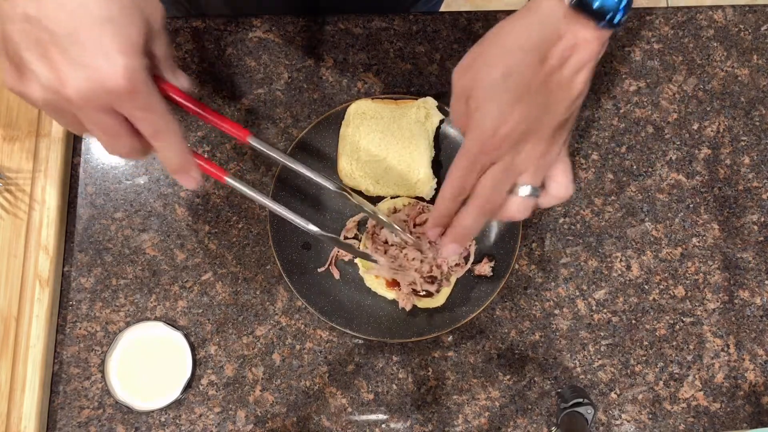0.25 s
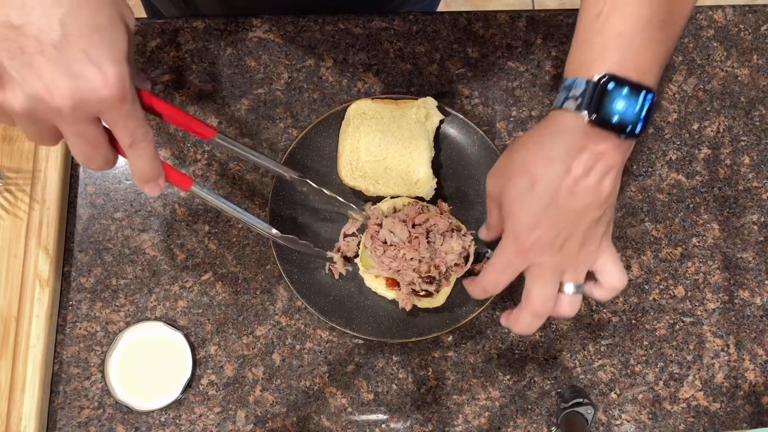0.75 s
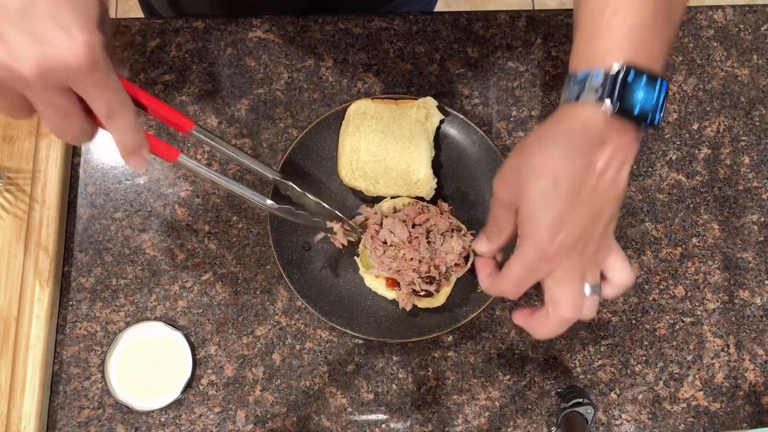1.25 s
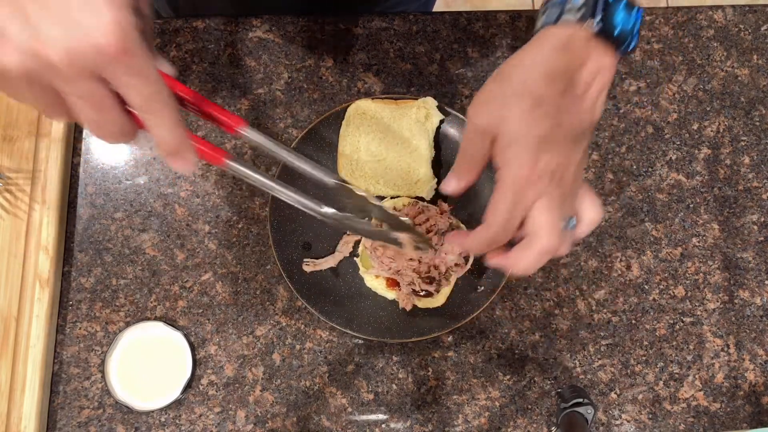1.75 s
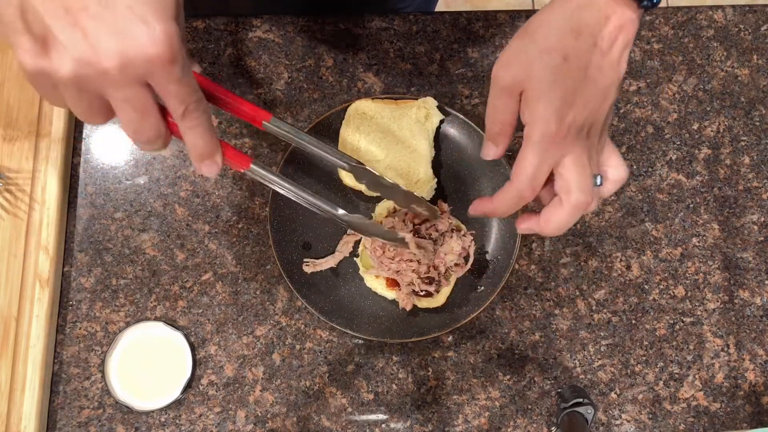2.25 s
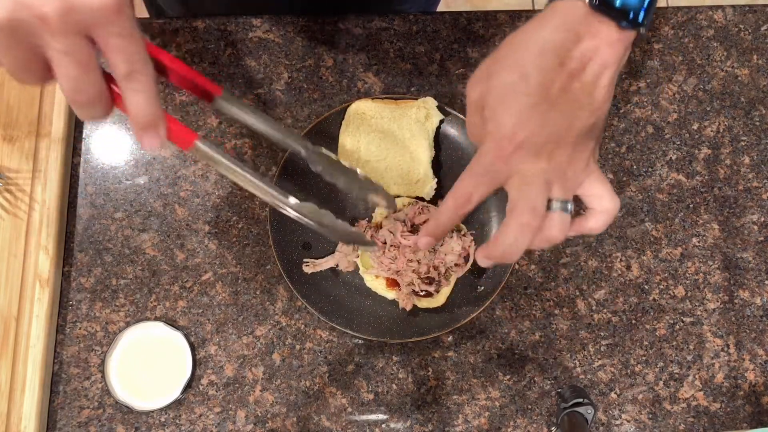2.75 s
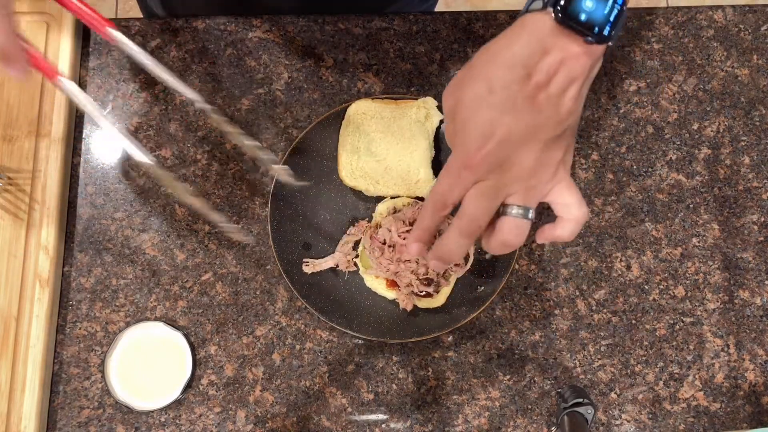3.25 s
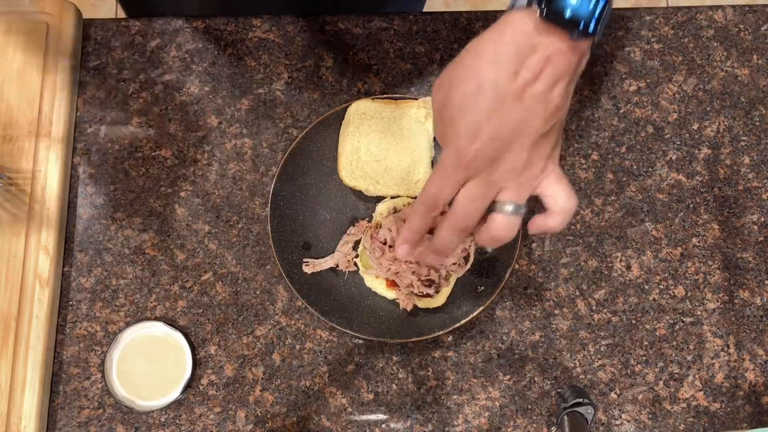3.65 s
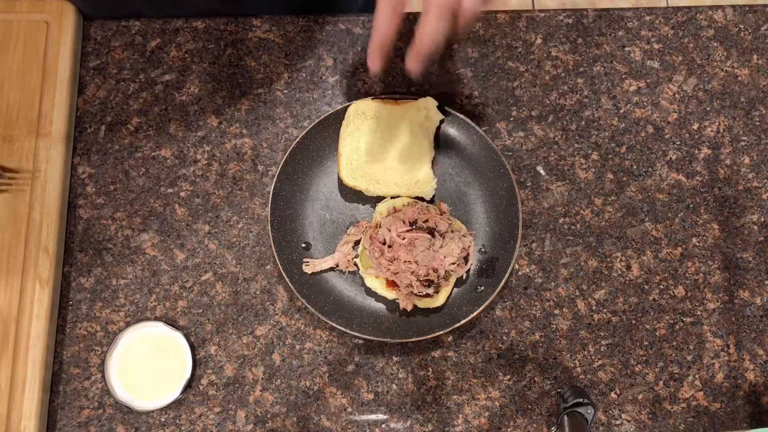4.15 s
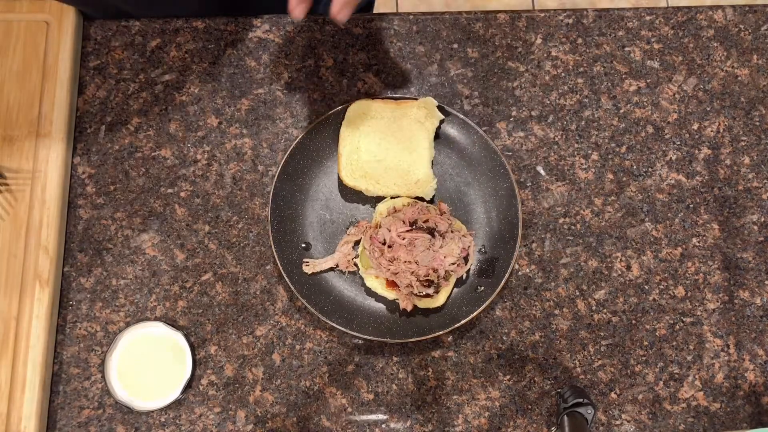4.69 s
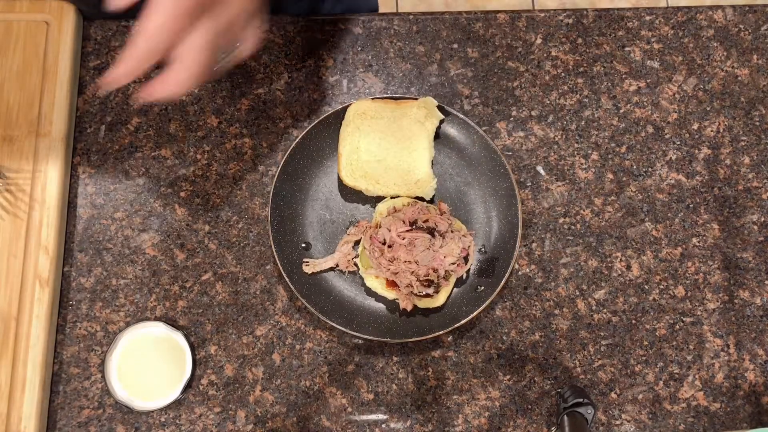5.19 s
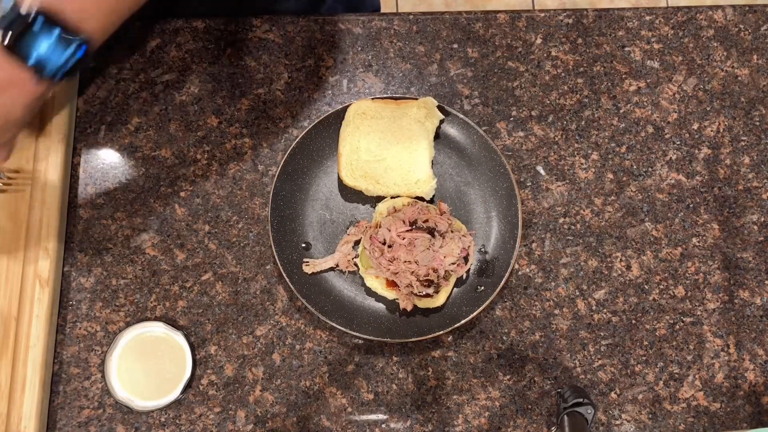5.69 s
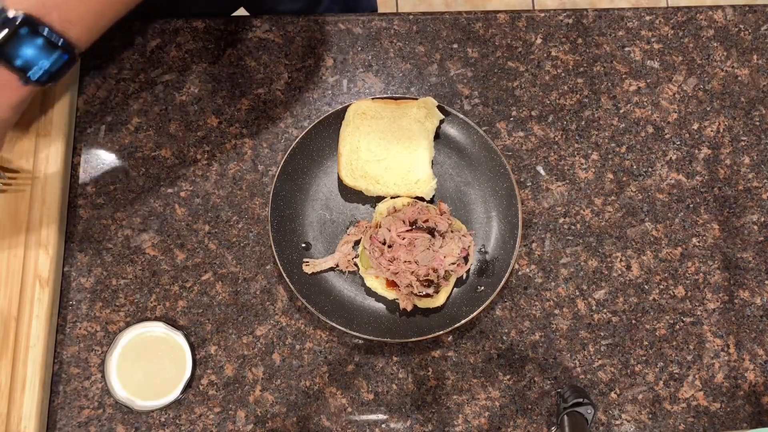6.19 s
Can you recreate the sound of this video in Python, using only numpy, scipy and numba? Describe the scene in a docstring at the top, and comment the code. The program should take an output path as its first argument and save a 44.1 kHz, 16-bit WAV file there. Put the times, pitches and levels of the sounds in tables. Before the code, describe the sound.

Soft moist food clicks and light plate taps, then tongs clack hard onto a wooden board and a spoon clinks sharply in a live kitchen.

```python
"""A kitchen counter heard from close above, on a phone: steel tongs and fingers arrange moist food on a plate,
the tongs are laid down on a wooden board, then a spoon taps a dish. Each blow is a noisy crack with damped
modes; food is filtered clicks; rubbing, shuffling and air are shaped noise. Appliances hum and hiss behind,
hard walls ring after every blow, and the phone turns its gain down after the loudest knocks."""
import sys
import numpy as np
from scipy import signal
from scipy.fft import rfft, irfft
from scipy.io import wavfile
from scipy.ndimage import uniform_filter1d
from numba import njit

SR = 44100
rng = np.random.default_rng(int(sys.argv[2]) if len(sys.argv) > 2 else 0)


def digitize_waveform(pressure):
    """Quantize a signal to 16-bit integers and store it at the path in sys.argv[1].

    Rows of a 2-D input are taken as channels; values are limited to [-1, 1].
    """
    field = np.atleast_2d(pressure).T
    bounded = np.clip(field, -1, 1)
    quanta = np.round(bounded * 32767).astype(np.int16)
    wavfile.write(sys.argv[1], SR, quanta)


def gain_from_db(level_db):
    """Turn a decibel level (scalar or array-like) into a linear amplitude factor."""
    decades = np.asarray(level_db, float) / 20
    return 10 ** decades


N = 283563
TIME = np.arange(N) / SR

# blows at the counter: (time [s], direct peak level [dB], brightness [dB per octave], place struck [0-1])
PLATE_TAPS = [(.6803, -28.5, 0, 0.49), (.759, -36.5, 1.5, 0.06), (.784, -38, 4.5, 0.5),
              (1.545, -47.5, -4, .24)]
BOARD_KNOCKS = [(4.245, 0, -0.86, 0.38), (4.5121, 4.5, 0.92, 0.072), (4.5312, -11, 0.92, 0.46)]
DISH_TAPS = [(5.6667, -6, 0.31, 0.072), (5.8678, -4, 0.22, 0.31), (6.0431, -5, 0.89, 0.22)]
SPOON_CLINKS = [(6.1869, -10, 0.58, 0.307), (6.3944, -21, -0.05, 0.38)]
# contact on plate, board, dish, spoon: (mode spread [share of frequency], crack decay constant [s],
# crack centre at zero brightness [Hz], crack peak over ring peak [dB])
CONTACT = [(0.0016, 0.0017, 2200, -9), (0.034, 0.002, 1380, -0.3), (0.0042, 0.0023, 2400, 1.7),
           (0.0016, 0.0017, 2630, -1.5)]
# what plate, board, dish, spoon send to the walls: (send of the whole [dB], extra on the ring alone [dB])
WALL_SENDS = [(-17, 0.5), (-6, -11), (-15.5, 0.3), (-16.5, 1)]
# ringing modes, before brightness, place and spread: (frequency [Hz], level [dB], t60 [s])
PLATE = [(1410, -10, 0.12), (1855, 6.5, 0.093), (2176, 2.5, 0.065), (3060, -4, 0.13), (4200, -4.5, 0.076),
         (5500, -9, 0.089), (6546, -19, 0.25), (9200, -11, 0.069), (11900, -15.5, 0.16)]
BOARD = [(139, -16.5, 0.052), (318.7, -2.5, 0.05), (499, -6.5, 0.13), (638, -1, 0.049), (750, -6, 0.045),
         (793, 4, 0.028), (1049, 1, 0.044), (1206, 7.5, 0.017), (1380, -0.5, 0.025), (1768, 6, 0.043),
         (2036, 0, 0.074), (2183, -6.5, 0.023), (2640, -16.5, 0.018), (3027, 3, 0.018), (3500, -9.5, 0.017),
         (4567, -8, .015), (5900, -7, .01), (8000, -29, 0.011), (11000, -25, .01), (12450, -17.5, .01),
         (15300, -25.5, 0.011)]
DISH = [(309, -14, 0.066), (670, -10.5, 0.019), (997, -12, 0.23), (1198, 3, 0.0074), (1532, -6.5, 0.049),
        (1676, -6.5, 0.065), (1817, 3, 0.056), (1950, -2.5, 0.06), (2137, -11.5, 0.042),
        (2524, -3.5, 0.056), (2750, -5.5, 0.028), (3355, -34, 0.052), (3550, -11.5, 0.072),
        (3830, -12, .05), (4146, -8, 0.06), (4280, 3, 0.016), (4700, -6.5, 0.053), (5200, -12.5, 0.061),
        (6020, -16, 0.056), (7040, -14, 0.023), (8200, -13, 0.023), (9920, -36, 0.013),
        (12800, -18.5, 0.015)]
SPOON = [(1723, -8.5, 0.079), (2240, -7.5, 0.025), (2934, 3.5, 0.013), (4020, -2, 0.035), (4500, -25, .05),
         (5150, -30, 0.072), (5900, -17, .1), (6630, -1, 0.077), (7600, -27, .08), (8800, -19, 0.065),
         (11320, -18.5, 0.066), (13900, -21, 0.047)]
# close neighbours of each mode: (offset [units of the mode spread])
NEIGHBOURS = [-1.47, 0.099, 1.05]

# tongs rubbing along the board: (start [s], end [s], rms level before flutter [dB])
RUBS = [(4.183, 4.19, -42.5), (4.27, 4.272, -36.5), (4.315, 4.332, -39)]
# spectrum of the rubbing: (frequency [Hz], relative level per Hz [dB])
RUB_COLOUR = [(880, -18.5), (1500, 3), (2890, -2), (3540, -2), (5190, 0.5), (5950, -7.5), (10400, -5.5),
              (15500, -17.5)]
# steel arms rattling between board knocks: (time [s], peak level [dB])
RATTLE = [(4.4318, -44), (4.456, -35), (4.4734, -35), (4.489, -37.5)]
# modes of the arms, before place and spread: (frequency [Hz], level [dB], t60 [s])
ARMS = [(5800, -3.5, 0.069), (7040, -4, 0.067), (11100, -6.5, 0.066), (13950, -1.5, 0.1), (14740, -9, .06)]

# moist food clicking under fingers and steel, the loudest ones: (time [s], peak level [dB], centre [Hz])
CLICKS = [(0.0357, -34, 6200), (0.0568, -36, 2480), (0.0615, -34, 8000), (0.0763, -27.5, 5600),
          (0.1227, -33, 8150), (0.1432, -38, 3660), (0.1547, -41, 8000), (0.183, -42, 6500),
          (0.2021, -37, 5200), (0.4778, -44, 8000), (1.4233, -36, 7500), (1.781, -26.5, 10400),
          (1.8435, -40, 9700), (2.9297, -39, 11000), (2.9402, -39, 8800), (2.9847, -42, 9700),
          (2.991, -32.5, 7650), (3.0212, -38, 5700), (3.0576, -32.5, 3500), (3.06, -40, 12000),
          (3.08, -38, 7200), (3.1344, -36.5, 5470), (3.262, -35.5, 13100), (3.2836, -33, 7600),
          (3.3552, -31.5, 4900), (3.366, -31.5, 7200), (3.4639, -34, 5530), (3.5288, -36, 3900),
          (3.568, -36.5, 2870), (3.607, -40.5, 8200), (4.182, -28.5, 5800), (4.2551, -18.5, 2800),
          (4.2776, -23.5, 3200), (4.3384, -22.5, 4200), (5.567, -28.5, 9200), (5.6347, -28.5, 7700),
          (5.6527, -41, 9500)]
# fingers pressing the food: (start [s], end [s], random tiny clicks [per s])
PRESSES = [(0, 0.21, 170), (1.41, 1.46, 150), (2.92, 3.636, 200), (5.58, 5.659, 40)]
# bands of the tiny clicks: (centre [Hz], smallest impulse before filtering [dB])
TINY_CLICKS = [(5500, -35.5), (8000, -39.5), (11500, -43)]

# dull knocks further off, heard mostly through the room:
# (time [s], rms level before its envelope [dB], centre [Hz], decay constant [s], send to the room [dB])
FAR_KNOCKS = [(0.381, -38.5, 810, 0.015, -9), (0.761, -43, 1320, 0.017, -15),
              (0.854, -43.5, 3520, 0.0056, -6), (0.893, -37, 1380, 0.015, -13),
              (2.043, -32, 2240, 0.0047, -10), (2.045, -38, 940, 0.0096, -5.5),
              (2.338, -37.5, 750, 0.017, -4.5), (2.342, -42, 2340, 0.0081, -5.5),
              (3.353, -35.5, 2390, 0.0058, -18.5), (4.467, -36, 550, 0.05, -0.5),
              (6.258, -28.5, 280, 0.032, -18), (6.26, -24.5, 700, 0.0049, -9)]
# a faint squeak: (start [s], end [s], rms level [dB])
SQUEAK = [(3.445, 3.5, -53.5)]
# someone shuffling about the room: (start [s], end [s], rms level before flutter [dB])
SHUFFLE = [(0, .05, -59), (.4, .65, -65), (.8, 1.1, -53.5), (2.67, 2.83, -46.5), (3.43, 3.5, -52.5),
           (3.82, 4.4, -52)]
# spectrum of the shuffling: (frequency [Hz], relative level per Hz [dB])
SHUFFLE_COLOUR = [(120, -29), (200, -3), (237, -14), (343, -2.5), (504, -5), (830, -5.5), (1240, -13),
                  (6000, -29), (7800, -55.5), (13200, -120)]
# bumps through the counter into the stand:
# (time [s], rms level over the push [dB], push length [s], brightness [dB per octave])
BUMPS = [(1.809, -36, 0.09, -2.2), (1.848, -45.5, 0.21, -5), (4.077, -42, 0.039, -7.5),
         (4.514, -36.5, 0.04, -5.5)]
# resonances of the stand: (centre [Hz], width [Hz], relative level before brightness [dB])
STAND = [(28, 16, -13), (96, 46, -2), (197, 31, -2), (355, 133, -5), (550, 390, -17.5)]

# decay of the room: (octave centre [Hz], t60 [s])
ROOM_T60 = [(125, 0.55), (250, 0.52), (500, 1), (1000, 0.52), (2000, 0.82), (4000, 0.4), (8000, 0.11),
            (14000, 0.35)]
# motor tones: (mean frequency [Hz], rms level before waver [dB], waver [dB])
HUM = [(58.6, -49.5, -2), (98.5, -49.5, 2.3)]
# narrow appliance noise: (centre [Hz], width of the first filter [Hz], rms level [dB])
WHIRR = [(27.22, 11, -66), (209.6, 16, -53.5), (270, 11, -60.5), (328.5, 11.46, -63.5), (434.3, 7.2, -64),
         (1598, 22, -69.5), (3500, 210, -70.5), (4072, 61, -72.5), (5190, 170, -69), (5706, 160, -65),
         (7310, 470, -68.5), (7790, 110, -70), (9840, 330, -68.5), (10400, 130, -76), (13950, 1500, -69),
         (15600, 400, -71)]
# spectrum of the broad air noise: (frequency [Hz], relative level per Hz [dB])
AIR = [(18, -33), (30, -10), (80, -10.5), (140, -7), (437, -15.5), (889, -22), (1220, -24), (2500, -30.5),
       (4200, -34), (6400, -35.5), (8500, -37.5), (12000, -38.5), (16000, -56.5)]


def blows(events, modes, spread, crack_s, crack_hz, crack_db, room_db, ring_room_db):
    """Each blow is a short noisy crack plus a ring; returns the direct sound and what reaches the walls."""
    tick_db, tick_hz, tick_s = -20, 13000, 0.0017
    direct, to_walls = np.zeros((2, N))
    t = TIME[:SR // 4]
    for s, db, tilt_db, place in events:
        body = ring(modes, tilt_db, place, spread)
        body /= np.abs(body).max()
        hz = crack_hz * gain_from_db(tilt_db)  # brighter blows crack higher
        crack = band(rng.standard_normal(len(t)), hz, 0.95 * hz) * np.exp(-t / crack_s)
        sound = body + gain_from_db(crack_db) * crack / np.abs(crack).max()
        # bright edge of hard contact
        tick = band(rng.standard_normal(len(t)), tick_hz, 0.81 * tick_hz) * np.exp(-t / tick_s)
        sound += gain_from_db(tick_db) * tick / np.abs(tick).max()
        sound *= 1 - np.exp(-t / .0004)  # contact takes a moment
        gain = gain_from_db(db) / np.abs(sound).max()
        add(direct, s, sound * gain)
        # the whole counter passes a broad snap to the walls; the ring has its own share
        snap = band(impulse(sound), 0.61 * hz, 1.53 * hz)
        snap = gain_from_db(2.5) * band(snap, 1.12 * hz, 3.9 * hz)
        add(to_walls, s, (snap + gain_from_db(ring_room_db) * body) * gain * gain_from_db(room_db))
    return np.array([direct, to_walls])


def ring(modes, tilt_db, place, spread):
    """Damped modes, each a trio of near neighbours; where the blow lands favours some and starves others."""
    hz, db, t60 = np.transpose(modes)[:, :, None, None]  # axes: mode, neighbour, time
    t = TIME[:SR // 4]
    rank = np.arange(len(modes))[:, None, None]
    db = db + tilt_db * np.log2(hz / 2000) + 2.1 * np.cos(2 * np.pi * place * rank)
    scatter = 0.92 * rng.standard_normal((len(modes), len(NEIGHBOURS), 1))
    hz = hz * (1 + spread * (np.array(NEIGHBOURS)[None, :, None] + scatter))
    side = (-1) ** rank  # neighbouring modes start in opposite directions
    decay = np.exp(-np.log(1000) * t / t60)
    return np.sum(side * gain_from_db(db) * decay * np.sin(2 * np.pi * hz * t), axis=(0, 1))


def tongs_moving():
    """Rough friction on wood as fluttering shaped noise, then the loose arms tick together and ring."""
    out = swell(RUBS, rise_db_s=902.5, fall_db_s=299.5) * coloured(RUB_COLOUR) * gain_from_db(1.9 * walk(160))
    for s, db in RATTLE:
        tick = ring(ARMS, 0, rng.random(), 0.015)
        add(out, s, tick * gain_from_db(db) / np.abs(tick).max())
    return out


def food():
    """Sticky clicks of a few cycles, with a haze of tiny ones where the fingers press."""
    click_width = 0.67  # band width over centre
    idle_per_s, tiny_spread_db = 4, 9.5
    out = np.zeros(N)
    t = TIME[:SR // 100]
    for s, db, hz in CLICKS:
        burst = rng.standard_normal(len(t)) * np.exp(-t / 0.0009)
        click = double_band(burst, hz, click_width * hz)
        add(out, s, click * gain_from_db(db) / np.abs(click).max())
    rate = idle_per_s + sum(per_s * (TIME > start) * (TIME < end) for start, end, per_s in PRESSES)
    for hz, db in TINY_CLICKS:
        chance, size = rng.random((2, N))
        happens = chance < rate / len(TINY_CLICKS) / SR
        tiny = happens * gain_from_db(db + tiny_spread_db * size)
        out += double_band(tiny, hz, .8 * hz)
    return out


def far_knocks():
    """Soft noisy thuds in a steep band; returns the direct sound and what is fed to the room."""
    direct, to_walls = np.zeros((2, N))
    t = TIME[:SR // 4]
    for s, db, hz, length, room_db in FAR_KNOCKS:
        width_hz = 1.4 * hz

        def steep(x):
            """Three passes through a resonance at one centre, the last twice as wide."""
            return double_band(band(x, hz, width_hz), hz, width_hz)

        envelope = np.exp(-t / length) * (1 - np.exp(-t / (0.14 * length)))
        thud = level(steep(rng.standard_normal(len(t))), db) * envelope
        snap = steep(impulse(thud))  # the walls hear one blow of the same colour
        add(direct, s, thud)
        add(to_walls, s, snap * gain_from_db(room_db) * np.std(thud) / np.std(snap))
    return np.array([direct, to_walls])


def squeak():
    """A brief rough squeak: noise in one narrow band."""
    tone = level(double_band(rng.standard_normal(N), hz=2560, width_hz=890), 0)
    return tone * swell(SQUEAK, rise_db_s=400, fall_db_s=250)


def shuffling():
    """Someone moving about the room: swells of shaped noise with a quick random flutter."""
    return swell(SHUFFLE, rise_db_s=127, fall_db_s=121.5) * coloured(SHUFFLE_COLOUR) * gain_from_db(1.5 * walk(40))


def bumps():
    """Short rough pushes that shake the stand's low resonances."""
    out = np.zeros(N)
    t = TIME[:SR // 2]
    for s, db, length, tilt_db in BUMPS:
        push = rng.standard_normal(len(t)) * np.clip((length - t) / 0.016, 0, 1)
        boom = np.zeros(len(t))
        for hz, width_hz, mode_db in STAND:
            mode = double_band(push, hz, width_hz)
            boom += level(mode, mode_db + tilt_db * np.log2(hz / 100))
        add(out, s, boom * gain_from_db(db) / np.std(boom[:int(length * SR)]))
    return out


def far_wall(x):
    """One clear slap back from the far wall, late by the trip there and back and held to a broad band."""
    out = np.zeros(N)
    add(out, 0.0294, gain_from_db(-13.5) * band(x, hz=3300, width_hz=5500))
    return out


def room(x):
    """Dense reflections as decaying noise, each octave dying at its own pace."""
    t = TIME[:SR]
    tail = np.zeros(SR)
    for hz, t60 in ROOM_T60:
        octave = level(band(rng.standard_normal(SR), hz, 0.88 * hz), 10 * np.log10(hz))  # power grows with Hz
        tail += octave * np.exp(-np.log(1000) * t / t60)
    tail *= 1 - np.exp(-np.maximum(t - .003, 0) / 0.0043)  # reflections gather after the first metre
    return signal.fftconvolve(x, gain_from_db(5.5) * tail / np.sqrt(np.sum(tail ** 2)))[:N]


def appliances():
    """Two wavering motor tones, narrow whirring bands and broad air noise."""
    out = gain_from_db(-49.5 + 0.52 * walk(3.1)) * coloured(AIR)
    for hz, db, waver_db in HUM:
        cycles = np.cumsum(hz + 0.393 * walk(3.6)) / SR + rng.random()
        out += np.sqrt(2) * gain_from_db(db + waver_db * walk(3.9)) * np.sin(2 * np.pi * cycles)
    for hz, width_hz, db in WHIRR:
        out += level(double_band(rng.standard_normal(N), hz, width_hz), db)
    return out


def level(x, db):
    """Scale to an rms level."""
    return x * gain_from_db(db) / np.sqrt(np.mean(x ** 2))


def add(track, s, sound):
    """Mix a sound into a track at a time."""
    i = int(s * SR)
    track[i:i + len(sound)] += sound[:N - i]


def band(x, hz, width_hz):
    """Resonant band-pass, its centre kept below half the sample rate."""
    return signal.lfilter(*signal.iirpeak(min(hz, .45 * SR), max(hz / width_hz, .4), fs=SR), x)


def double_band(x, hz, width_hz):
    """Two resonances in a row at one centre, the second twice as wide."""
    return band(band(x, hz, width_hz), hz, 2 * width_hz)


def coloured(points):
    """Noise of rms 1 shaped by (frequency [Hz], level [dB]) points on a log frequency axis."""
    hz, db = np.transpose(points)
    bins = np.maximum(np.fft.rfftfreq(N, 1 / SR), 1)
    shape = gain_from_db(np.interp(np.log(bins), np.log(hz), db))
    return level(irfft(rfft(rng.standard_normal(N)) * shape, N), 0)


def walk(rate):
    """Random levels held 1 / rate s and slewed twice; spread near 1."""
    k = int(SR / rate)
    steps = np.repeat(rng.standard_normal(N // k + 1), k)
    return 1.4 * uniform_filter1d(uniform_filter1d(steps, k), k)[:N]


def impulse(energy_of):
    """One sample holding the energy of a sound."""
    out = np.zeros(len(energy_of))
    out[0] = np.sqrt(np.sum(energy_of ** 2))
    return out


def swell(rows, rise_db_s, fall_db_s):
    """Gain that climbs to each (start [s], end [s], level [dB]) plateau and sinks after it, steadily in dB."""
    return sum(gain_from_db(db - rise_db_s * np.maximum(start - TIME, 0) - fall_db_s * np.maximum(TIME - end, 0))
               for start, end, db in rows)


def scene():
    """All sources in the kitchen, with the walls answering the blows and the small close sounds."""
    events = (PLATE_TAPS, BOARD_KNOCKS, DISH_TAPS, SPOON_CLINKS)
    things = zip(events, (PLATE, BOARD, DISH, SPOON), CONTACT, WALL_SENDS)
    direct, to_walls = far_knocks() + sum(blows(hits, modes, *contact, *send)
                                          for hits, modes, contact, send in things)
    close = food() + tongs_moving() + squeak()  # small sounds near the phone
    walls = far_wall(direct) + room(to_walls + gain_from_db(-14) * close)
    return (direct + close + walls + shuffling() + bumps() + appliances())[None]


@njit
def gain_control(x, knee, grab_db, recover_db, smooth):
    """Output above the knee pulls the gain down; it follows with a lag and creeps back in dB per second."""
    y, aim, db = np.empty(len(x)), 0., 0.
    for i in range(len(x)):
        y[i] = x[i] * 10 ** (db / 20)
        excess = max(abs(y[i]) - knee, 0.)
        aim = min(aim + (recover_db - grab_db * excess) / SR, 0.)
        db += smooth * (aim - db)
    return y


def band_limit(x):
    """A steep low-pass at the top of the band."""
    return signal.sosfilt(signal.butter(12, 16980, fs=SR, output="sos"), x)


def record(dry):
    """The phone ducks after loud blows and rounds the peaks."""
    ducked = gain_control(dry[0], knee=0.17, grab_db=4960.0, recover_db=4.2, smooth=0.0007)
    mix = np.tanh(1.153 * ducked)[None] / 1.077
    return band_limit(mix)


dry = scene()
out = record(dry)
digitize_waveform(out)
```